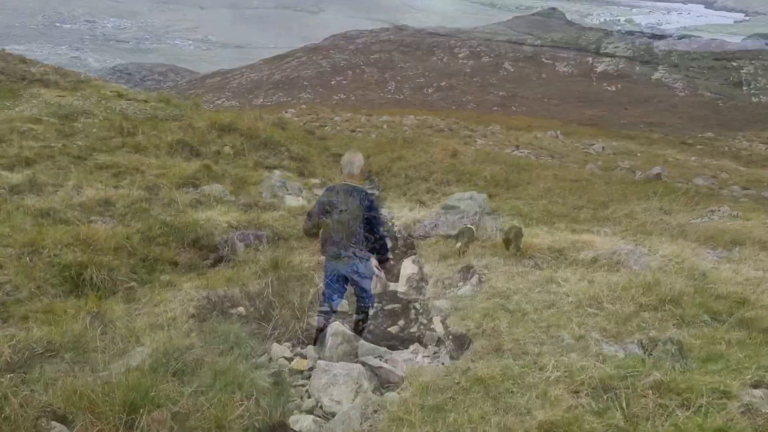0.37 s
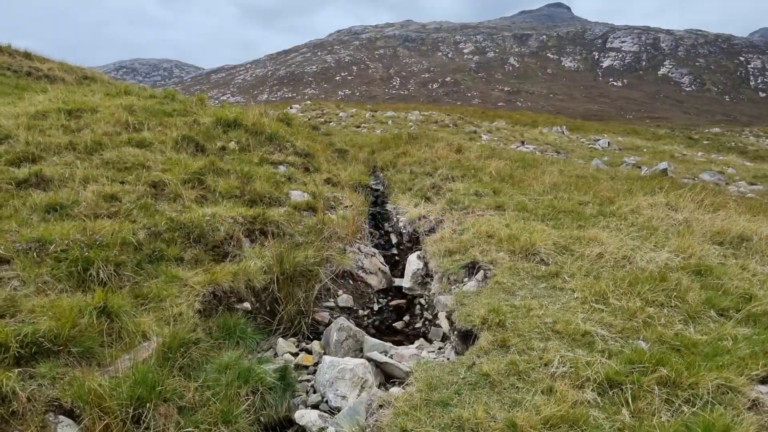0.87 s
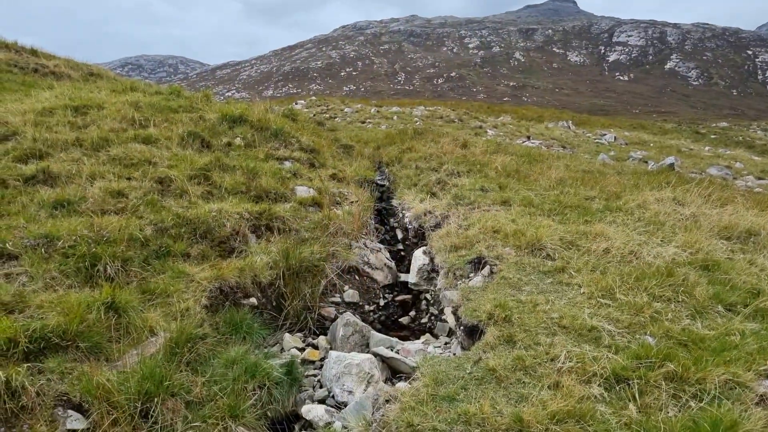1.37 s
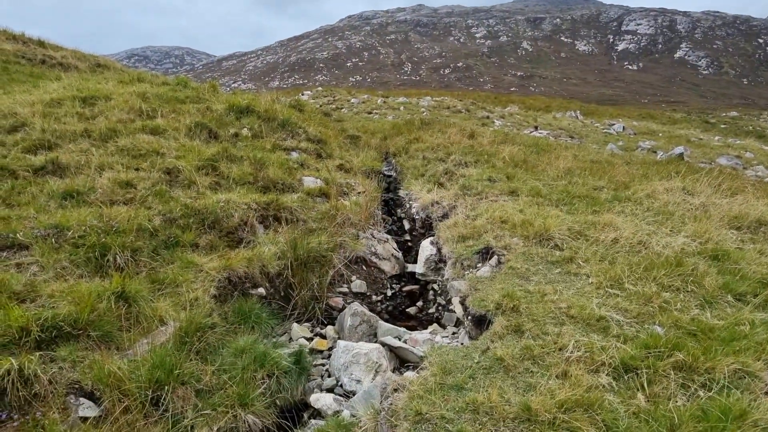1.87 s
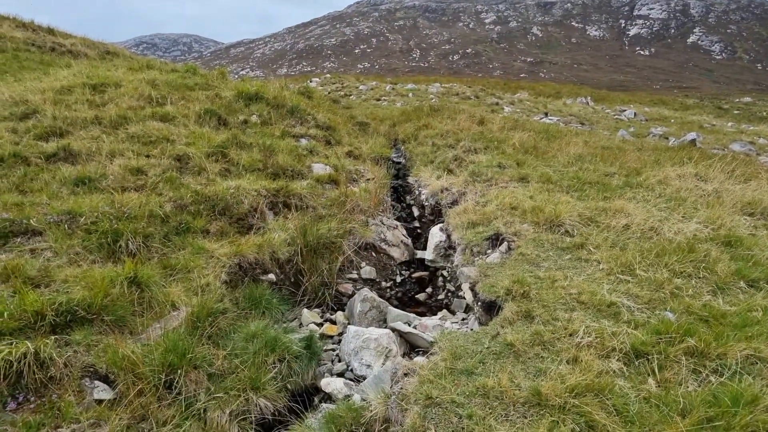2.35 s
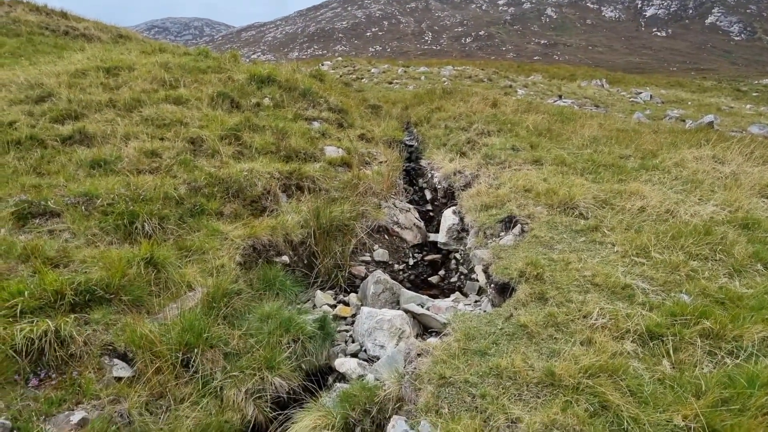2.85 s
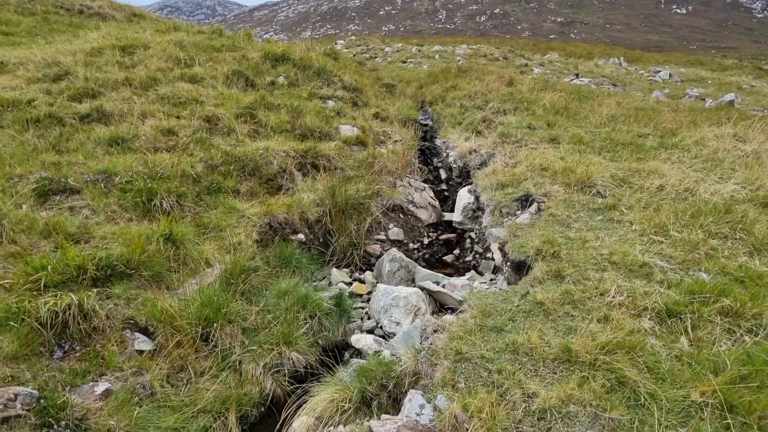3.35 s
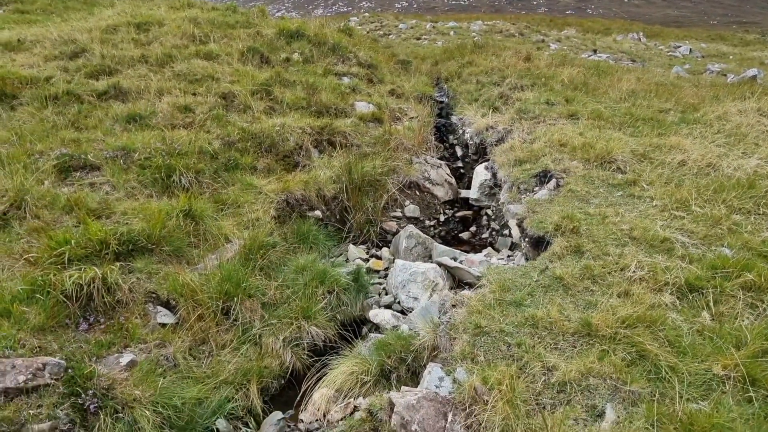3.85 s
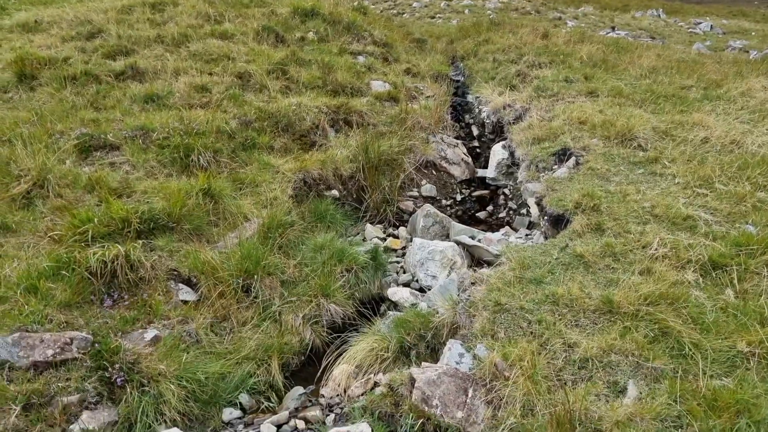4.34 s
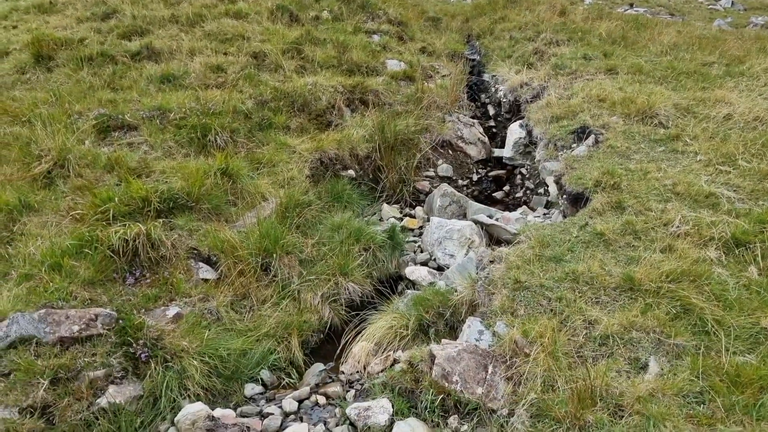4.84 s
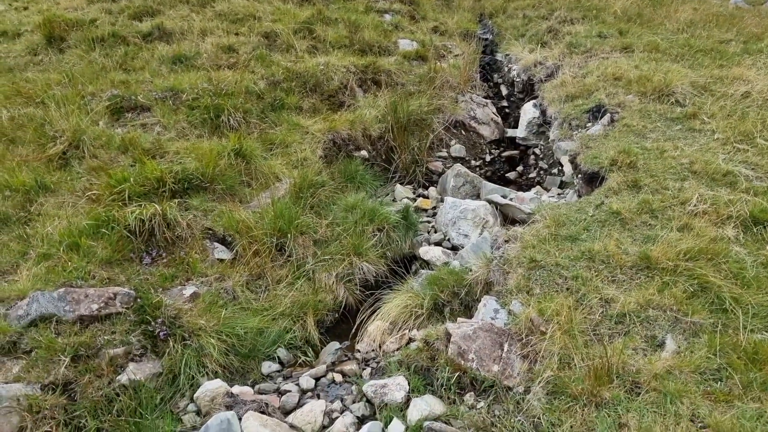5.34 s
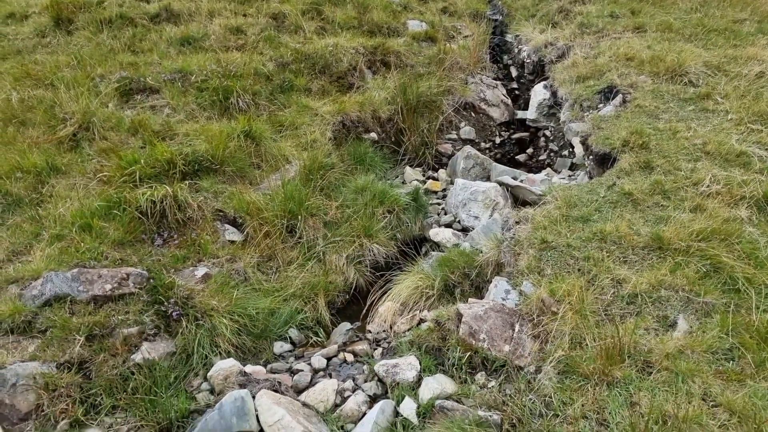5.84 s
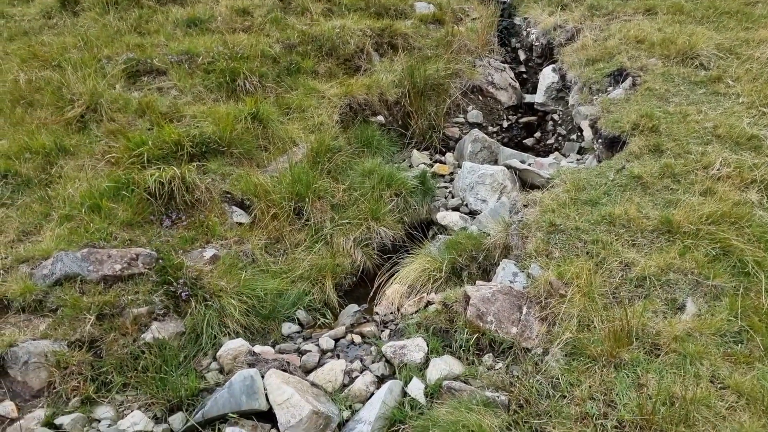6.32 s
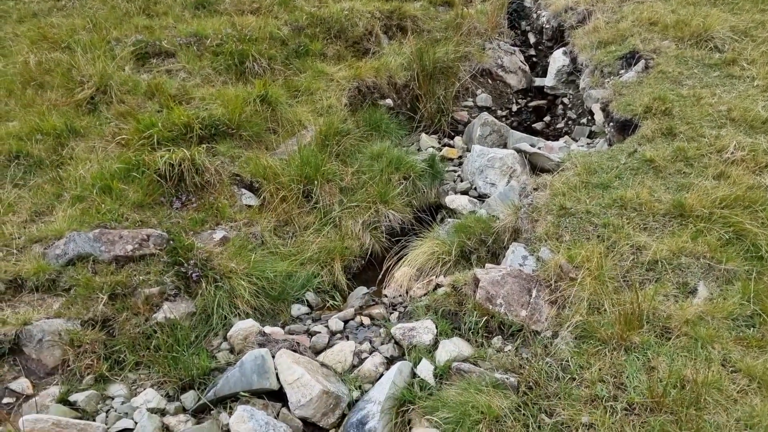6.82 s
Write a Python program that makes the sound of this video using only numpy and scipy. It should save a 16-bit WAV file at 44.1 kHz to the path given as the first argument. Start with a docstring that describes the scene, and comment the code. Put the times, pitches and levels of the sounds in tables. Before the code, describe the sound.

A small stream trickles through a rocky gully on an open hillside. Quiet, clumpy bubbling and fine spray ticks run continuously over a soft hush, while sharp single drops plink at varied pitches, mostly high and glassy, some low and hollow. Bright little splats hit stone. A low wind puff bumps the microphones early on. Close, wide stereo with very short stone reflections.

```python
"""Stony gully on an open hillside: a thin stream trickles, heard by two spaced microphones.
Drops plink into small pools as damped bubble tones under a surface tick, or splat on stones as noise bursts.
Countless small bubbles and spray ticks ring the hollows between the rocks, over a soft hush of shaped noise.
Stone walls and the gully bank answer; a few puffs of wind rumble on the microphones."""
import sys
import numpy as np
from scipy import signal
from scipy.fft import rfft, irfft, next_fast_len
from scipy.io import wavfile
from scipy.ndimage import map_coordinates

SR = 44100
rng = np.random.default_rng(int(sys.argv[2]) if len(sys.argv) > 2 else 0)


def inscribe(sig):
    """Save sig as 16-bit PCM at rate SR to the path in sys.argv[1].

    A 1-D sig is mono; a 2-D sig holds one channel per row.
    Samples are clipped to [-1, 1] before scaling.
    """
    pcm = np.round(np.clip(np.atleast_2d(sig).T, -1, 1) * 32767)
    wavfile.write(sys.argv[1], SR, pcm.astype(np.int16))


def elevation(decibels):
    """Turn decibel levels (scalar or array-like) into linear amplitude ratios."""
    levels = np.asarray(decibels, float)
    return 10 ** (levels / 20)


N = 306495


def along(points, hz):
    """Interpolates (Hz, value) points on a log frequency axis."""
    point_hz, value = np.transpose(points)
    return np.interp(np.log(hz + 1), np.log(point_hz + 1), value)


def unit(x):
    """Scales to rms 1."""
    return x / np.sqrt(np.mean(x ** 2))


def wobble(rate_hz):
    """Smooth random curve with rate_hz knots a second."""
    knots = rng.standard_normal(int(N * rate_hz / SR) + 4)
    return map_coordinates(knots, [np.arange(N) * rate_hz / SR])


def filtered(x, response):
    """Applies a complex response of frequency in Hz."""
    size = next_fast_len(N + 8192)
    spectrum = rfft(x, size) * response(np.fft.rfftfreq(size, 1 / SR))
    return irfft(spectrum, size)[..., :N]


def resonances(modes):
    """Complex response of (Hz, width Hz, dB) resonances, signs alternating."""
    def response(hz):
        total = 0
        for k, (center_hz, width_hz, db) in enumerate(modes):
            damping = 1j * hz * width_hz
            total = total + (-1) ** k * elevation(db) * damping / (center_hz * center_hz - hz * hz + damping)
        return total
    return response


def scatter(start_s, waves):
    """Sums the rows of waves, each from its own start."""
    at = np.round(start_s * SR).astype(int)[:, None] + np.arange(waves.shape[1])
    return np.bincount(at.ravel(), waves.ravel(), N + SR)[:N]


def bubbles(hz, db, t60_s, climb, swell_cycles, size):
    """Damped sines that swell softly and climb in pitch as the bubble nears the surface."""
    t = np.arange(size) / SR
    hz, db, t60_s = hz[:, None], db[:, None], t60_s[:, None]
    turns = hz * t * (1 + climb * np.minimum(t / t60_s, 1))
    swell = (1 - np.exp(-t * hz / swell_cycles)) ** 2
    return elevation(db - 60 * t / t60_s) * swell * np.sin(2 * np.pi * turns)


def ticks(db, t60_s, size):
    """Decaying noise bursts with a brief swell."""
    t = np.arange(size) / SR
    envelope = elevation(db[:, None] - 60 * t / t60_s) * (1 - np.exp(-t / t60_s / 0.19))
    return envelope * rng.standard_normal((len(db), size))


# Loud drops. Each row: start in s, bubble pitch in Hz, strength in dB, lag at the right microphone in ms.
DROP_EVENTS = [(0.013, 2940, -15.5, 1.2), (0.044, 8330, -26.5, 1.04), (0.083, 7100, -26.5, 0.41),
               (0.163, 4770, -22.5, 1.27), (0.2175, 1385, -19.5, 0.43), (0.214, 3970, -27, 0.4),
               (0.218, 2050, -34, 0.39), (0.241, 1910, -26.5, 0.39), (0.429, 4060, -23, 0.43),
               (0.502, 2530, -26, 0.34), (0.625, 2460, -15, 1.04), (0.714, 2940, -9.5, 1.12),
               (0.736, 8100, -25, 0.54), (0.986, 4530, -19.5, 0.57), (1.508, 2800, -18.5, 1.04),
               (1.699, 5750, -20, 0.424), (1.761, 660, -19.5, 0.65), (1.894, 7280, -24.5, 0.5),
               (2.073, 8700, -18, 0.41), (2.073, 5340, -27, 1.07), (2.138, 4950, -19, 1.1),
               (2.273, 3580, -16, 0.41), (2.76, 2670, -12.5, 1.08), (2.836, 2120, -23.5, 0.4),
               (2.91, 2450, -21, 1.05), (2.912, 7060, -15.5, 0.34), (2.911, 4800, -10.5, 1.11),
               (2.911, 5830, -14, 0.43), (2.911, 3500, -21, 0.4), (2.936, 1630, -26.5, 0.4),
               (2.96, 750, -26, 0.8), (2.986, 756, -27, 0.45), (3.011, 2660, -18, 1.05),
               (3.112, 2690, -24, 1.05), (3.224, 770, -27, 0.44), (3.28, 2220, -28, 0.53),
               (3.281, 4130, -13, 0.37), (3.28, 5070, -22.5, 0.99), (3.312, 8440, -22.5, 0.41),
               (3.349, 1335, -14.5, 0.45), (3.363, 1407, -19.5, 0.43), (3.349, 2050, -25.5, 0.39),
               (3.355, 2600, -22, 1.14), (3.363, 2620, -32, 1.1), (3.552, 4800, -25.5, 0.63),
               (3.6, 1503, -20, 1.02), (3.602, 2740, -11.5, 1.08), (3.832, 2550, -5, 0.48),
               (3.885, 4480, -19.5, 0.36), (3.97, 610, -23, 0.58), (3.978, 424, -22, 0.51),
               (3.988, 420, -24, 0.42), (3.971, 240, -21, 0.42), (3.932, 727, -28.5, 0.57),
               (4.075, 260, -21, 0.42), (4.171, 4670, -16.5, 0.52), (4.172, 2650, -4.5, 1.14),
               (4.249, 2660, -15.5, 1.11), (4.265, 2660, -15, 1.05), (4.482, 2950, -18, 1.1),
               (4.483, 4960, -23.5, 0.966), (4.483, 2420, -14.5, 0.49), (4.518, 3140, -14, 1.07),
               (4.549, 8270, -25.5, 1.04), (4.588, 7300, -26.5, 0.74), (4.668, 4780, -19.5, 1.12),
               (4.668, 7400, -31.5, 0.42), (4.7219, 1380, -20.5, 0.42), (4.719, 3950, -24, 0.42),
               (4.721, 2050, -31, 0.4), (4.737, 2820, -22.5, 0.98), (4.745, 1900, -26, 0.41),
               (4.76, 1950, -31, 0.37), (4.927, 2690, -20, 0.99), (5.131, 2480, -14.5, 0.98),
               (5.191, 5700, -25, 0.27), (5.219, 3020, -7.5, 1.04), (5.238, 7960, -23.5, 0.54),
               (5.49, 4640, -18.5, 1.06), (5.497, 4140, -28, 0.42), (4.933, 4010, -20.5, 0.42),
               (5.369, 4630, -32.5, 1.04), (3.029, 4550, -26.5, 1.04), (0.841, 4650, -30, 1.04),
               (4.419, 4550, -31, 1.04), (5.564, 2380, -22.5, 0.48), (5.662, 2830, -19.5, 0.85),
               (5.916, 676, -19, 0.8), (6.227, 8830, -26.5, 0.49), (6.227, 5450, -28.5, 1.2),
               (6.293, 5070, -21.5, 0.46), (6.426, 3560, -17.5, 0.43), (6.914, 2720, -14, 1.156),
               (0.15, 4720, -38, 1.04), (0.202, 710, -31, 0.54), (0.212, 2970, -31, 1.04),
               (0.232, 2800, -28, 1.04), (0.409, 4470, -34, 0.45), (0.634, 728, -30, 0.48),
               (0.652, 4700, -32, 1.04), (0.736, 2680, -25, 1), (0.818, 2410, -21, 0.61),
               (1.047, 2850, -36, 1.04), (1.059, 2390, -25, 0.53), (1.196, 727, -29.5, 0.52),
               (1.308, 736, -25, 0.75), (1.38, 5500, -28, 0.436), (1.516, 4600, -23, 1.01),
               (1.565, 4700, -29.5, 1.04), (1.584, 2740, -26.5, 1.04), (1.665, 4750, -33, 1.04),
               (1.76, 2264, -29, 0.56), (1.849, 4870, -27, 1.14), (1.866, 3010, -27, 1.04),
               (1.964, 5800, -30.5, 0.37), (2.201, 3080, -23, 1.1), (2.349, 4600, -31, 1.04),
               (2.499, 3270, -25, 1.04), (2.592, 2820, -37, 0.87), (2.611, 890, -33, 0.46),
               (2.706, 2310, -33, 0.43), (2.849, 770, -34, 0.42), (2.894, 2970, -30, 1.04),
               (2.919, 4700, -31, 1.04), (2.924, 2960, -25, 1.04), (2.947, 6000, -28, 0.43),
               (3.393, 3200, -23.5, 1.05), (3.583, 3120, -31, 1.07), (3.801, 3500, -31, 0.47),
               (3.865, 780, -30, 0.52), (3.957, 7060, -30, 0.487), (4.048, 2780, -30, 1.1),
               (4.086, 2800, -31, 1.04), (4.183, 6200, -29, 0.4), (4.187, 2520, -16.5, 1.05),
               (4.213, 611, -24.5, 0.58), (4.238, 5070, -30, 0.93), (4.309, 2250, -30.5, 0.52),
               (4.542, 740, -35, 0.49), (4.707, 726, -32, 0.48), (4.717, 2950, -29, 1.3),
               (4.764, 574, -26, 0.55), (4.914, 4350, -33, 0.45), (5.073, 2820, -30, 0.98),
               (5.134, 717, -25, 0.56), (5.157, 4560, -33, 1.04), (5.242, 2660, -24.5, 1.1),
               (5.323, 2400, -24, 0.58), (5.345, 4670, -29.5, 1.04), (5.463, 1995, -38, 0.34),
               (5.7, 732, -27.5, 0.55), (5.822, 4760, -28, 1.04), (6.003, 4600, -30.5, 1.07),
               (6.019, 2790, -26, 0.98), (6.047, 7300, -28, 0.5), (6.355, 3070, -28.5, 1.02),
               (6.86, 2300, -34, 0.45)]
# Bubble ring, longest near 1400 Hz. Each row: pitch in Hz, t60 in s.
RING_T60 = [(500, 0.014), (1400, 0.048), (2000, 0.013), (2600, 0.01), (8000, 0.0053)]
# Bubble onset. Each row: pitch in Hz, swell time constant in cycles.
SWELL_CYCLES = [(700, 2.46), (1400, 1.4), (2700, 2.17), (5000, 1.9)]
# Pitch climb of a dying bubble. Each row: pitch in Hz, mean climb up to t60 as a share of pitch.
PITCH_CLIMB = [(700, 0.013), (1300, 0.04), (2000, 0.0092), (4700, 0.0078)]
# Stereo lean of the drops. Each row: pitch in Hz, left over right in dB.
DROP_LEAN_DB = [(700, 2), (1400, 0), (2600, 0), (4500, -5), (7200, 9), (8700, 0)]
SHAKE_AT_4KHZ = 0.16  # share of amplitude


def drops():
    """Each drop ticks on the surface, then its bubble rings, roughened by the shaking water."""
    start_s, hz, db, late_ms = np.transpose(DROP_EVENTS)
    size = 3000
    waves = bubbles(hz, db, along(RING_T60, hz), climb=along(PITCH_CLIMB, hz)[:, None],
                    swell_cycles=along(SWELL_CYCLES, hz)[:, None], size=size)
    cycles = hz[:, None] * np.arange(size) / SR
    rows, cycles = np.broadcast_arrays(np.arange(len(hz))[:, None], cycles)
    shake = map_coordinates(rng.standard_normal((len(hz), 200)), [rows, cycles / 4])  # one knot per 4 cycles
    waves *= 1 + SHAKE_AT_4KHZ * np.sqrt(hz / 4000)[:, None] * shake  # small bubbles are shaken most
    waves[:, :199] += np.diff(ticks(db - 22, 0.0024, size=200))  # differencing brightens the tick
    lean = elevation(along(DROP_LEAN_DB, hz) / 2)[:, None]
    left = scatter(start_s, waves * lean)
    right = scatter(start_s + late_ms / 1000, waves / lean)
    return np.array([left, right])


# Splats on bare stone. Each row: start in s, strength in dB.
SPLAT_EVENTS = [(0.044, -25), (0.216, -28.5), (0.3481, -23.5), (0.958, -29.5), (1.136, -30), (1.6656, -23),
                (1.702, -24.5), (0.6085, -44), (0.7337, -28), (1.1508, -28), (2.0726, -37), (2.1216, -30),
                (2.5277, -33), (2.9542, -36), (3.1148, -31), (3.3907, -31), (3.4241, -32), (4.4004, -40),
                (5.1128, -47), (5.239, -28), (5.489, -29), (5.6421, -28), (6.2751, -32), (6.6817, -38),
                (2.924, -24), (3.518, -31), (3.6017, -25), (3.777, -30), (3.8298, -24), (4.4828, -19),
                (4.518, -20), (4.549, -26), (4.7214, -27), (4.737, -31), (4.824, -34), (4.853, -21.5),
                (5.464, -27.5), (5.656, -23.5), (5.819, -21), (6.225, -33)]
SPLAT_LEAN_DB = 3  # the bare stones lie to the left


def splats():
    """Bright high-passed noise bursts of spray, drawn separately for each microphone."""
    start_s, db = np.transpose(SPLAT_EVENTS)
    bursts = np.array([scatter(start_s, ticks(db + side * SPLAT_LEAN_DB / 2, 0.016, size=600))
                       for side in (1, -1)])
    return filtered(bursts, lambda hz: 1j * hz / (6000 + 1j * hz))


# Ticks of coarse, middle and fine spray. Each row: center in Hz, width in Hz, level in dB.
SPRAY_BANDS = [(2800, 5500, -2), (6600, 4700, -2.5), (12600, 5600, -5.5)]
# Air hollows between the rocks. Each row: resonance in Hz, width in Hz, level in dB.
ROCK_HOLLOWS = [(482, 283, -2), (732, 80, 7.5), (1292, 78, 1), (1760, 280, -3.5), (2344, 1050, -0.5),
                (3610, 484, 2.5), (4670, 360, 0), (6085, 430, 1), (7300, 650, -1), (14100, 3440, -5)]


def trickle(count):
    """Small bubbles and spray ticks, in quick clumps, excite the hollow resonances."""
    place, pitch, life, size = rng.random((count, 4)).T
    clumps = elevation(1.35 * wobble(14) + 2.17 * wobble(70))
    strength_db = np.minimum(-4.5 * np.log(size), 8)  # many faint, few strong
    hz = 350 * 26 ** pitch
    db = strength_db * (0.15 + 0.95 * pitch) - 5 * (1 - pitch)
    t60_s = (5 + 34 * life * pitch) / hz
    fizz = scatter(place * N / SR, bubbles(hz, db, t60_s, climb=0.2, swell_cycles=0.7, size=1000))
    crackle = 0
    for band in SPRAY_BANDS:
        place, size = rng.random((count // 14, 2)).T
        tick_db = np.minimum(-5 * np.log(size), 9)
        bursts = scatter(place * N / SR, ticks(tick_db, 0.0063, size=500))
        crackle = crackle + filtered(bursts, resonances([band]))
    mixed = clumps * (unit(fizz) + 1.006 * unit(crackle))
    return unit(filtered(mixed, resonances(ROCK_HOLLOWS)))


# Hush spectrum. Each row: frequency in Hz, relative density in dB per Hz.
HUSH_SPECTRUM = [(35, -19), (75, -8.5), (140, -13), (300, 3), (750, 3), (1100, -11), (3000, 3.5),
                 (8000, -8.5), (11000, -14), (16000, -9)]


def hush():
    """Shaped noise of the farther flow and the air, with a wobbling level."""
    noise = rng.standard_normal(N) * elevation(1.84 * wobble(7.8))
    return unit(filtered(noise, lambda hz: elevation(along(HUSH_SPECTRUM, hz))))


# Wind puffs. Each row: start in s, strength in dB, left over right in dB.
WIND_PUFFS = [(0.259, -32, 19), (1.241, -13, -7), (1.279, -19, -8), (1.335, -9, -3), (1.537, -20, -13),
              (4.75, -29, 17), (5.697, -18, -9)]


def wind():
    """Short low rumbles: band-limited noise bursts, unrelated between the microphones."""
    start_s, db, pan_db = np.transpose(WIND_PUFFS)
    gusts = np.array([scatter(start_s, ticks(db + side * pan_db / 2, 0.095, size=8000)) for side in (1, -1)])
    return filtered(gusts, lambda hz: 1j * hz / (60 + 1j * hz) / (1 + 1j * hz / 150) ** 4)


# Stone walls. Each row: frequency in Hz, t60 in s.
WALL_T60 = [(500, 0.064), (1500, 0.043), (4000, 0.056), (12000, 0.0079)]


def walls(x):
    """Short noise-tail answer of the stones, redrawn every 0.1 s as the drops fall in new places."""
    out, step = np.zeros(N + SR), SR // 10
    for i in range(0, N, step):
        hz, t, z = signal.stft(rng.standard_normal(4096), SR, nperseg=128)
        decay = elevation(-60 * t / along(WALL_T60, hz)[:, None])
        tail = signal.istft(z * decay, SR, nperseg=128)[1]
        wet = signal.fftconvolve(x[i:i + step], tail / np.linalg.norm(tail))
        out[i + 60:i + 60 + len(wet)] += wet  # 60 samples late
    return out[:N]


BANK_MS, BANK_DB, BANK_HZ = 8.165, -5, 1080  # delay, level, upper limit


def bank(x):
    """Adds the low murmur that comes back off the gully bank: one delayed low-passed copy."""
    def response(hz):
        delay = np.exp(-2j * np.pi * hz * BANK_MS / 1000)
        return 1 + elevation(BANK_DB) * delay / np.sqrt(1 + (hz / BANK_HZ) ** 8)
    return filtered(x, response)


# Left-right likeness. Each row: frequency in Hz, likeness as a share of 1.
LIKENESS = [(60, 0.14), (500, 1), (1000, 0.96), (1500, 0.81), (3500, 0.8), (6000, 0.22), (12000, 0.12)]
# Paths round the rocks to the right microphone. Each row: lag in ms, level in dB.
RIGHT_PATHS = [(0.438, -4), (0.702, -19.5), (1.033, -7.5), (1.43, -22)]
# Stereo lean by frequency. Each row: frequency in Hz, left over right in dB.
LEAN_DB = [(100, 2.5), (400, -2), (740, -5), (1400, 1.5), (3300, -3), (5500, -2.5), (7500, 1.5), (10000, 6),
           (13500, -2), (15500, 1)]


def spaced(x):
    """One source at both microphones: later, by several paths and partly decorrelated on the right."""
    z = signal.stft(x, nperseg=256)[2]
    scrambled = z * np.exp(2j * np.pi * rng.random(z.shape))  # same magnitudes, random phases
    twin = signal.istft(scrambled, nperseg=256)[1][:N]
    twin = unit(twin) * np.std(x)

    def alike(hz):
        return np.clip(along(LIKENESS, hz), 0, 1)

    def paths(hz):
        return sum(elevation(db) * np.exp(-2j * np.pi * hz * ms / 1000) for ms, db in RIGHT_PATHS)

    shared = filtered(x, lambda hz: alike(hz) * paths(hz))
    unshared = filtered(twin, lambda hz: np.sqrt(1 - alike(hz) ** 2))
    pair = np.array([x, shared + unshared])
    return filtered(pair, lambda hz: elevation(np.outer([0.5, -0.5], along(LEAN_DB, hz))))


# Stream flow. Each row: time in s, relative flow level in dB.
FLOW_LEVEL = [(0.0, -51), (0.13, -53), (0.31, -53.5), (1.26, -54), (1.62, -51.5), (2.54, -53), (2.84, -50),
              (3.31, -52.5), (3.79, -50.5), (4.16, -53), (4.72, -52), (4.88, -51), (5.73, -51.5),
              (6.02, -53.5), (6.66, -54), (6.95, -52.5)]
SCATTER_HZ = 1500  # stones scatter only short waves back from a drop


def scene():
    """Flow sets the level of all small sounds; drops and trickle share the stone walls."""
    time_s, flow_db = np.transpose(FLOW_LEVEL)
    flow = elevation(np.interp(np.arange(N) / SR, time_s, flow_db))
    small = bank(flow * (elevation(2) * trickle(count=5000) + elevation(-2.5) * hush()))
    loud = drops() + splats()
    loud_echo = filtered(walls(loud[0]), lambda hz: (1j * hz / (SCATTER_HZ + 1j * hz)) ** 2)
    echoes = elevation(-7) * walls(small) + elevation(-7) * loud_echo
    return spaced(small + echoes) + loud + wind()


def top_cut(x):
    """Nothing passes above the cut-off."""
    return signal.sosfilt(signal.butter(12, 16960, fs=SR, output="sos"), x)


def record(dry):
    """Recorder's first-order bass cut at 50 Hz and band limit at 15800 Hz."""
    mix = filtered(dry, lambda hz: (hz < 15800) * 1j * hz / (50 + 1j * hz))
    return top_cut(mix)


dry = scene()
out = record(dry)
inscribe(out)
```